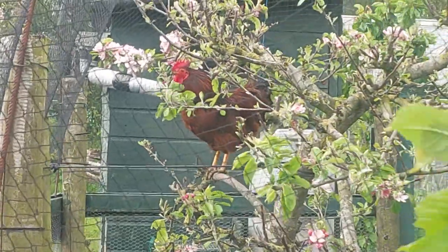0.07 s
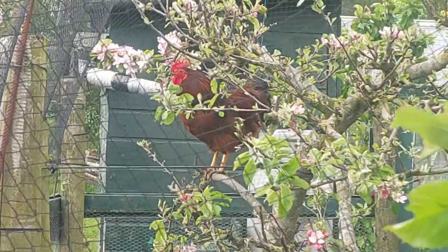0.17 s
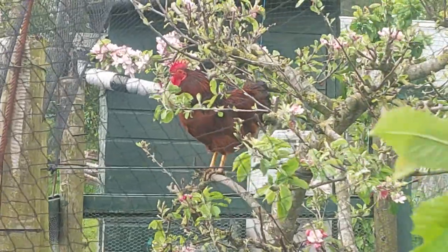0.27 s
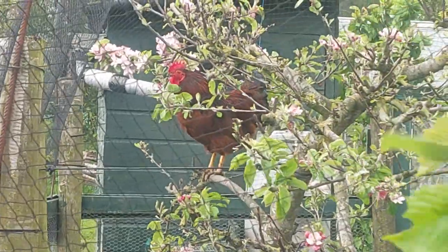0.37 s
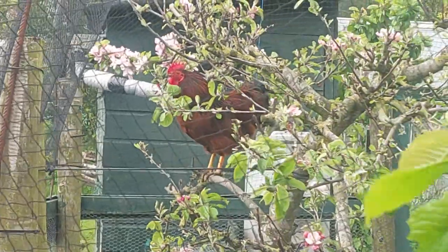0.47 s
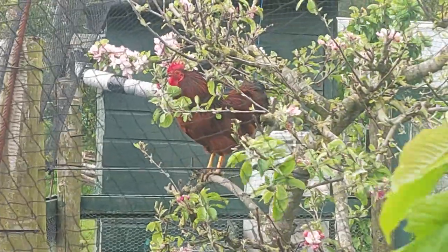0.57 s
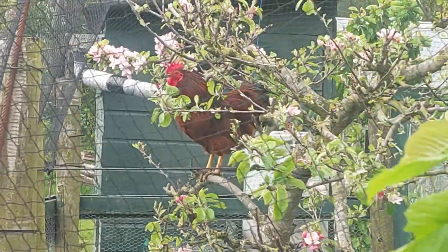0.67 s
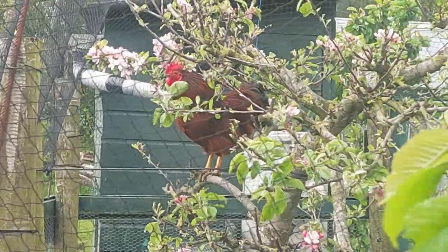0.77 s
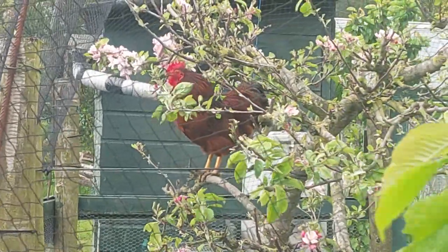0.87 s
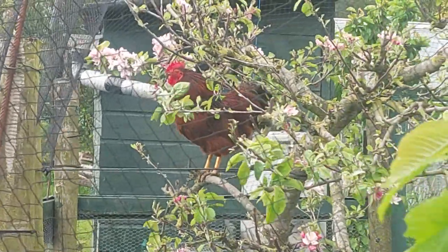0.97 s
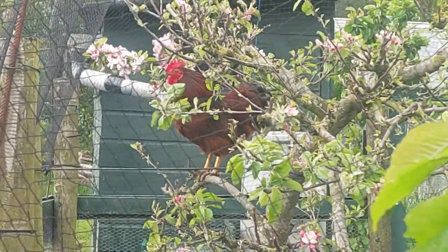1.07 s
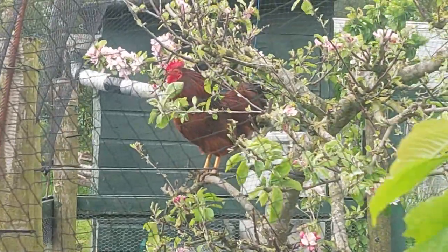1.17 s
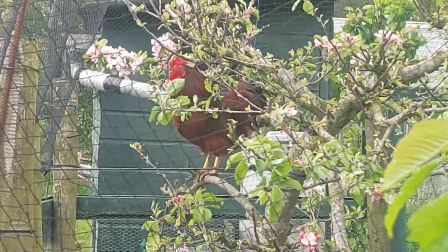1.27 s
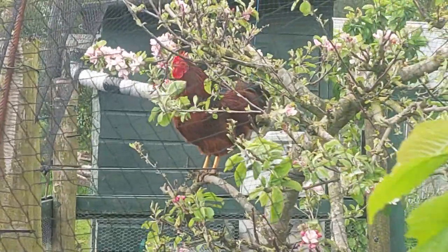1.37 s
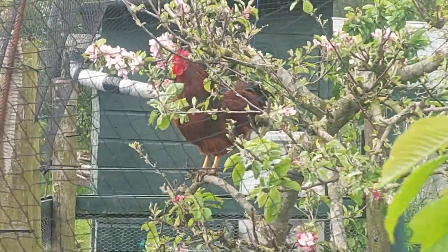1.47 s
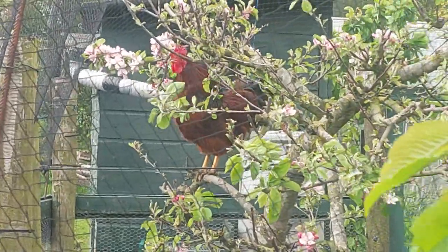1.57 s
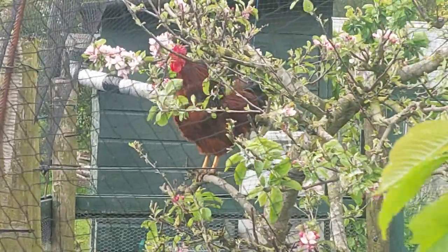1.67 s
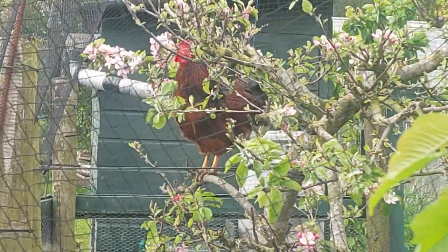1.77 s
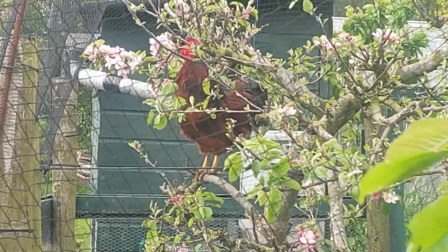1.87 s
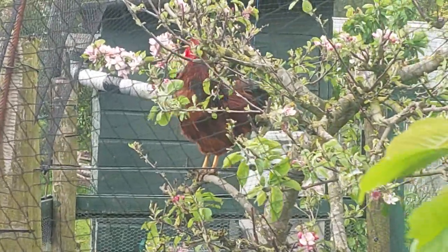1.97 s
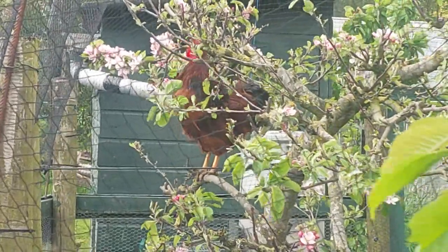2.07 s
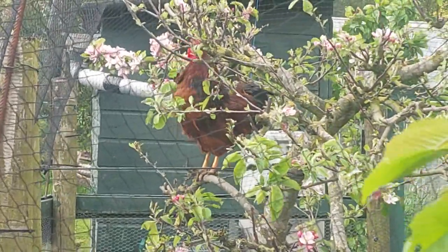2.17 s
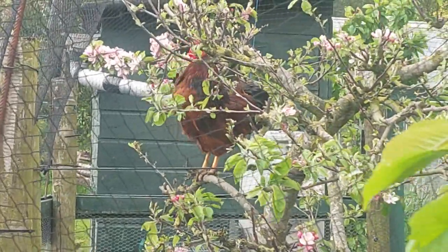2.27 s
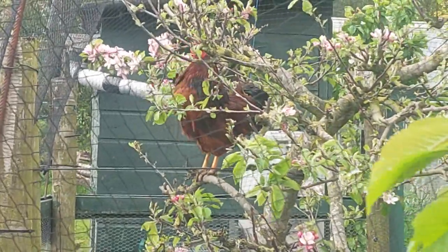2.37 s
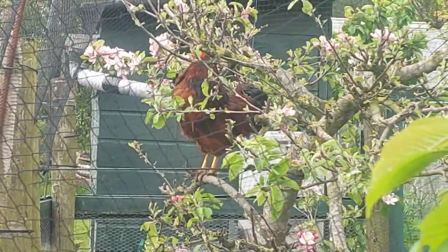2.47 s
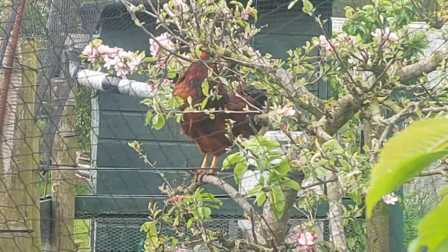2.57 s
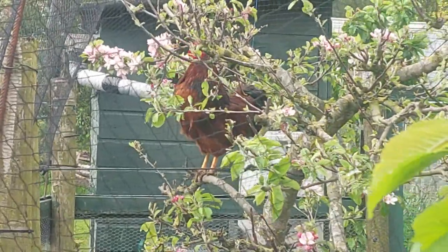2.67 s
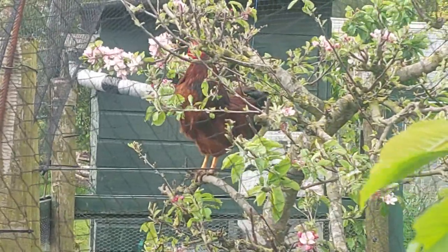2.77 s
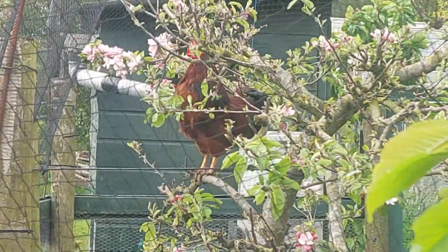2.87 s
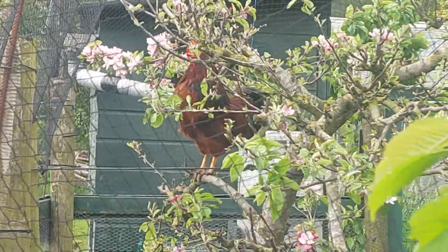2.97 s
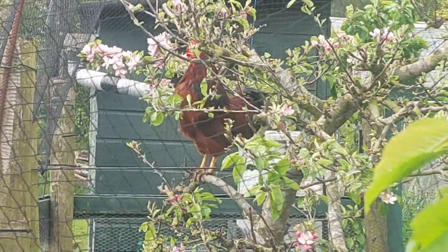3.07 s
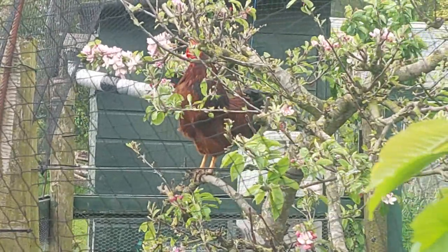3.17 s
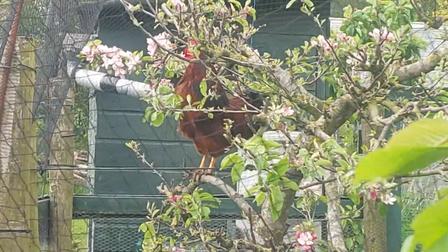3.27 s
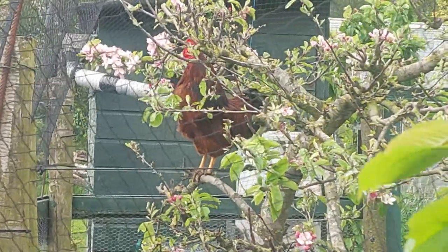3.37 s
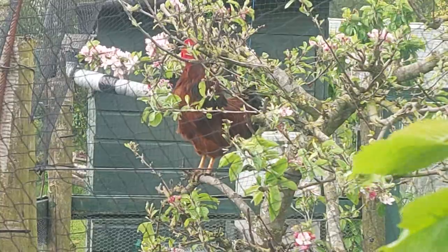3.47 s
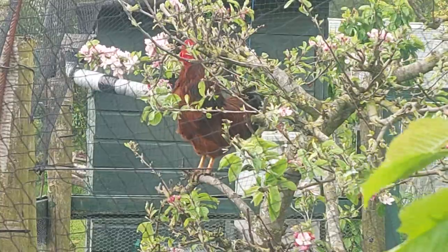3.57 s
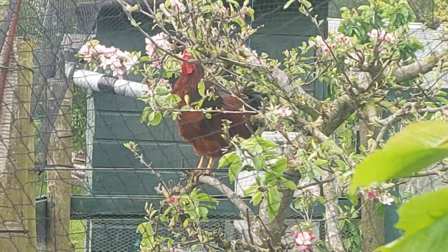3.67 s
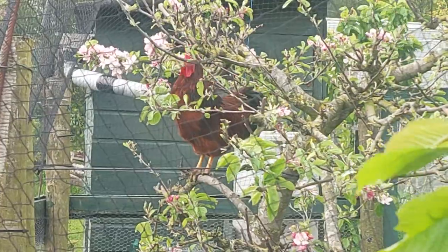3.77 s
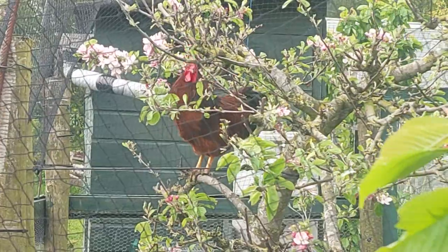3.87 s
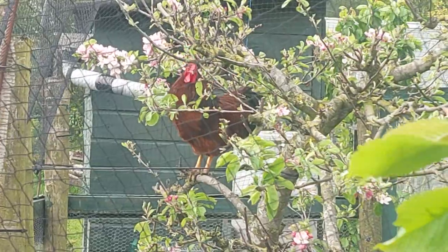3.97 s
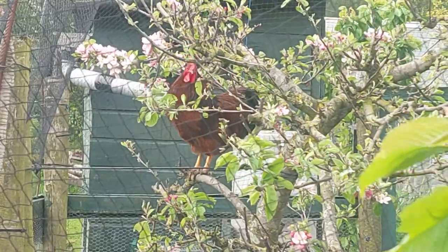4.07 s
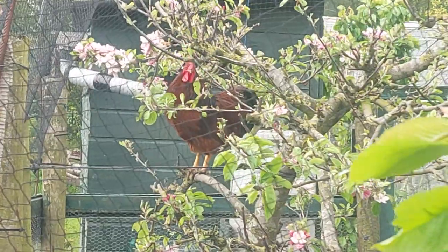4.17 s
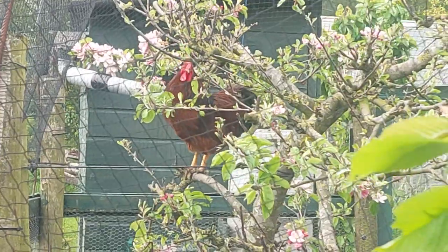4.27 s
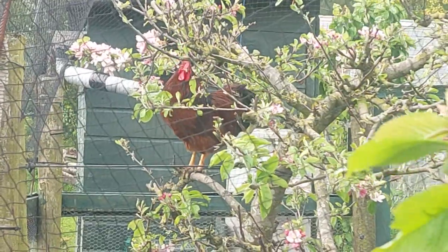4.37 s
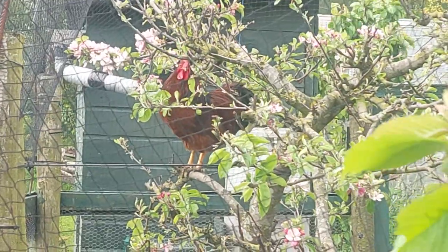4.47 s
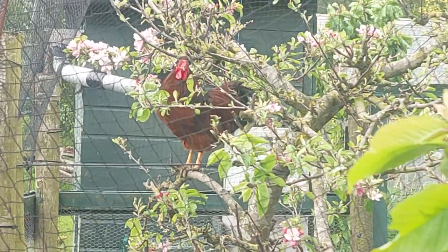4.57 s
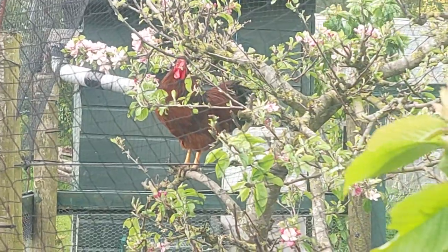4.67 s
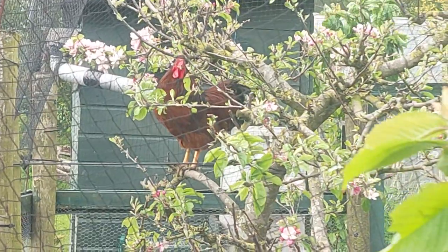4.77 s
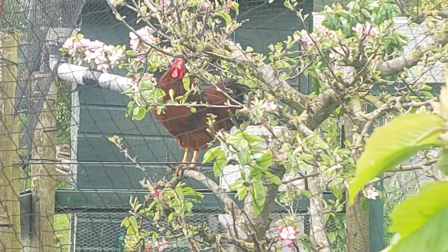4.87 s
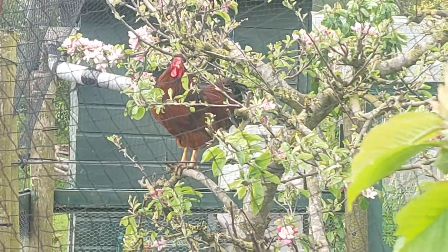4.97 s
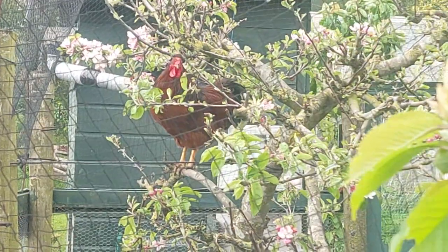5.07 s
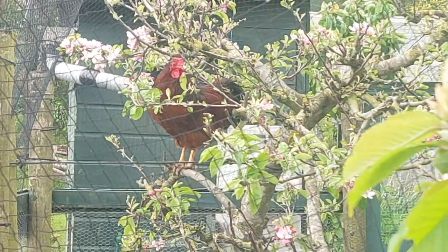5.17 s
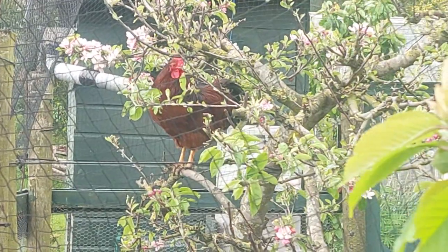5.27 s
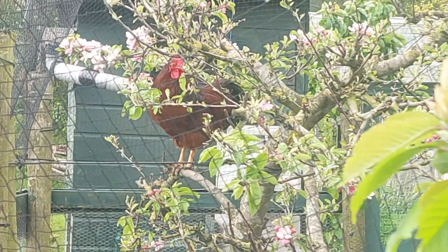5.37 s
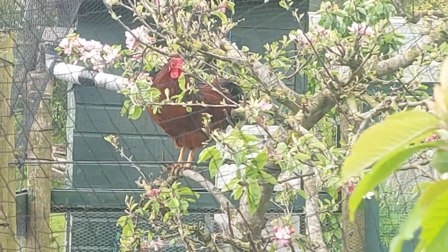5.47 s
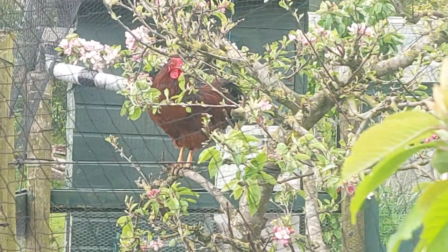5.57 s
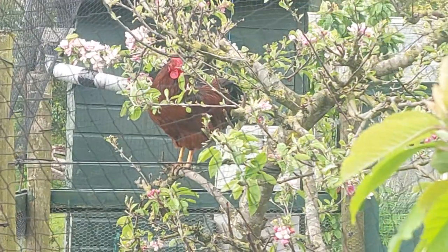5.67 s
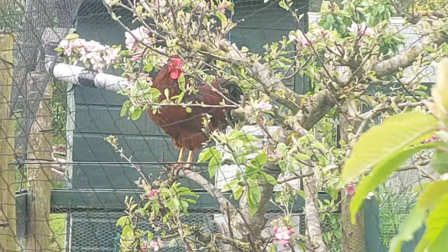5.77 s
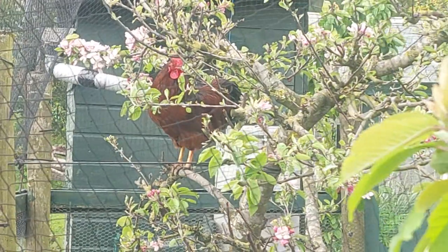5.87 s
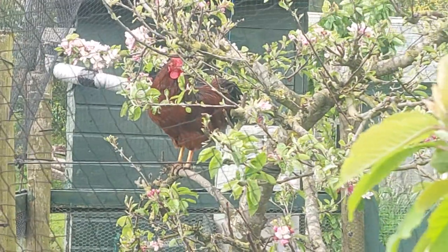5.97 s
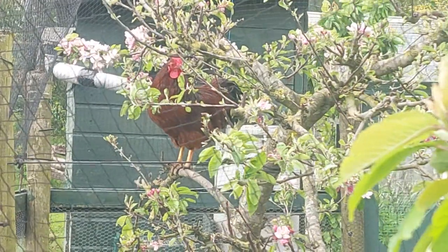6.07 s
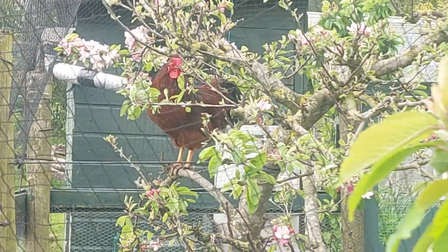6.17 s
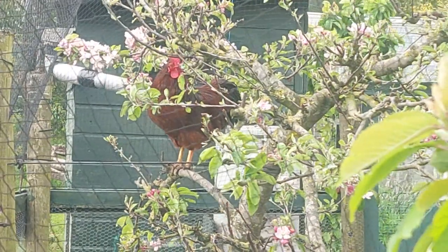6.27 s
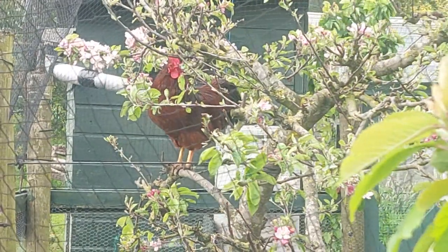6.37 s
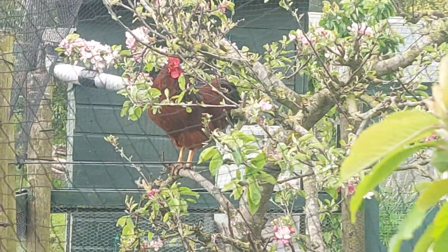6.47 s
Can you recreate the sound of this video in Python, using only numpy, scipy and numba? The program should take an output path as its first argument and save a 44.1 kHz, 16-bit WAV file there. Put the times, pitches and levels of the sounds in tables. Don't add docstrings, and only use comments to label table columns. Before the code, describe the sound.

A garden heard through a stereo phone microphone, with a faint road hum towards the left. From 0 to 0.3 s, irregular low wind thumps hit the microphone, with leaf hiss fading away. Thin bird whistles and falling chirps appear from about 0.4 to 1.7 s, with another wind bump and a tick near 1.2 s. At 1.76 s a rooster a few metres away crows: a rough opening syllable sinks by 2.05 s, a loud, high call leaps up at 2.1 s and holds until 2.7 s, mixing harsh rasp and clean notes, then a lower syllable falls and rises until 3.15 s, fading as breathy rasp by about 3.6 s. A short outdoor echo follows. The background is briefly hushed, then road hum returns around 4.5 s, with a dry tick. From 5.3 s, faint birds whistle again; from 6.1 s, twigs tick, low wind bumps and leaves stir until 6.5 s.

```python
import sys
import numpy as np
from scipy import signal
from scipy.fft import rfft, irfft
from scipy.io import wavfile
from scipy.ndimage import uniform_filter1d
from numba import njit

SR = 44100
rng = np.random.default_rng(int(sys.argv[2]) if len(sys.argv) > 2 else 0)


def transcribe(u):
    v = np.clip(np.atleast_2d(u).T, -1, 1)
    q = np.round(v * 32767).astype(np.int16)
    wavfile.write(sys.argv[1], SR, q)


def amplitude_ratio(level_db):
    exponent = np.asarray(level_db, float) / 20
    return 10 ** exponent


N = 287532
TIME = np.arange(N) / SR


def unit(x):
    return x / np.sqrt(np.mean(x ** 2))


def curves(rows):
    s, *columns = np.transpose(rows)
    return [np.interp(TIME, s, c) for c in columns]


def swell(t, length, edge):
    return np.clip(np.minimum(t, length - t) / edge, 0, 1)


def gate(t0, t1, edge=0.0047):
    return swell(TIME - t0, t1 - t0, edge)


def span(t0, t1):
    return slice(int(t0 * SR), min(int(t1 * SR), N))


def turns(hz):
    return 2 * np.pi * np.cumsum(hz) / SR


def decay(t, t60):
    return np.exp(-np.log(1000) * t / t60)


def echo_tail(t, t60, first_s=0):
    tail = rng.standard_normal((2, len(t))) * decay(t, t60) * (t >= first_s)
    return tail / np.sqrt(np.sum(tail ** 2, axis=1, keepdims=True))


def colour(x, points):
    hz, db = np.transpose(points)
    f = np.fft.rfftfreq(N, 1 / SR) + 1
    return irfft(rfft(x) * amplitude_ratio(np.interp(np.log(f), np.log(hz), db)), N)


def band(x, lo_hz, hi_hz, order=2):
    return signal.sosfilt(signal.butter(order, [lo_hz, min(hi_hz, SR / 2.2)], "band", fs=SR, output="sos"), x)


def walk(rate, size=N):
    k = int(SR / rate)
    steps = np.repeat(rng.standard_normal(size // k + 1), k)
    return 1.4 * uniform_filter1d(uniform_filter1d(steps, k), k)[:size]


@njit
def svf(x, hz, width):
    y, b, l = np.empty(len(x)), 0., 0.
    for i in range(len(x)):
        g, k = np.tan(np.pi * hz[i] / SR), width / hz[i]
        v = (b + g * (x[i] - l)) / (1 + g * (g + k))
        b, l, y[i] = 2 * v - b, l + 2 * g * v, k * v
    return y


# (time [s], level [dB])
ROAD_LEVEL = [
    (0.0, -58.5),
    (1.566, -61),
    (1.72, -56.5),
    (3.62, -60),
    (3.82, -64.5),
    (4.5, -59),
    (4.88, -56.5),
    (5.49, -57.5),
    (6.36, -56.5),
]
# (frequency [Hz], level [dB per Hz])
ROAD_COLOUR = [(180, -31.5), (300, -7), (498, -4.5), (580, -3.5), (876, -2.5), (1320, -8), (1690, -7.5),
               (3430, -25), (5000, -38), (6500, -60.5), (11000, -120)]


def road():
    level_db = curves(ROAD_LEVEL)[0]
    lag = 15
    layers = []
    for alike, lo_hz, hi_hz in ((.78, 350, 1500), (.5, 1500, 4500)):
        both, left, right = (colour(rng.standard_normal(N), ROAD_COLOUR) for _ in range(3))
        shared = np.array([both, np.roll(both, lag)])
        pair = alike * shared + np.sqrt(1 - alike ** 2) * np.array([left, right])
        layers.append(unit(band(pair, lo_hz, hi_hz)))
    hum = layers[0] * amplitude_ratio(level_db + 7 + 1.1 * walk(5.7))
    swish = layers[1] * amplitude_ratio(level_db - 1.5 + .8 * walk(6.4))
    return hum + swish


def far_whine():
    whine = unit(band(rng.standard_normal((2, N)), 3840, 4030))
    return whine * amplitude_ratio(-80.5 + 2.8 * walk(2.47)) * gate(3.5, 7, edge=0.15)


# (frequency [Hz], level [dB per Hz])
LEAF_COLOUR = [(1470, -38), (2500, -2), (2980, -3.5), (4600, -3), (4960, -4.5), (6210, -4.5), (8320, -8),
               (9410, -17.5), (13400, -12), (15100, -17.5), (15800, -21)]


def leaves():
    fading_db = -62.5 - 8.5 * TIME
    rising_db = -70.5 - 41 * (TIME[-1] - TIME)
    still_db = -77.5
    stir = np.sqrt(amplitude_ratio(fading_db) ** 2 + amplitude_ratio(rising_db) ** 2 + amplitude_ratio(still_db) ** 2)
    hiss = unit(colour(rng.standard_normal((2, N)), LEAF_COLOUR))
    return hiss * stir * amplitude_ratio(8.0) * amplitude_ratio(.7 * walk(6))


# (time [s], length [s], start [Hz], end [Hz], level [dB])
BIRD_WHISTLES = [(0.662, 0.052, 2300, 2400, -63.5), (0.92, 0.069, 2360, 2440, -61.5),
                 (0.974, 0.08, 2434, 2430, -59), (1.058, 0.12, 2400, 2300, -64.5),
                 (1.195, .125, 2400, 2370, -65), (1.489, 0.1, 2490, 2520, -60.5),
                 (1.64, .08, 2400, 2430, -68), (5.742, 0.023, 2670, 2510, -55),
                 (5.772, 0.145, 2310, 2450, -59), (1.277, 0.074, 3590, 3100, -58.5),
                 (1.352, 0.052, 3120, 3430, -59), (1.655, 0.055, 3460, 3480, -56),
                 (1.694, 0.0427, 3480, 3100, -51), (1.733, 0.03, 3090, 3160, -54),
                 (6.324, 0.066, 3220, 3410, -58), (6.388, 0.05, 3230, 3230, -54.5),
                 (6.458, 0.06, 3150, 3300, -62.5), (6.384, .016, 2700, 3200, -59),
                 (6.43, .014, 3150, 2600, -60), (6.452, .016, 2700, 3150, -63), (5.9, .06, 2440, 2420, -68),
                 (1.672, 0.034, 6050, 4640, -67), (5.275, 0.075, 2100, 1930, -67.5),
                 (5.58, 0.095, 1934, 1800, -68), (6.053, 0.18, 1933, 1825, -64.5),
                 (5.733, 0.07, 671, 655, -66), (5.848, 0.1, 673, 673, -59), (6.019, 0.1, 673, 667, -56)]
# (time [s], length [s], start [Hz], end [Hz], level [dB])
BIRD_CHIRPS = [
    (0.442, .06, 6030, 4660, -59),
    (0.815, 0.046, 6500, 5720, -61.5),
    (1.566, 0.045, 6300, 4650, -61),
    (5.685, 0.016, 2700, 2450, -60.5),
    (5.711, 0.023, 2950, 2360, -59),
    (6.0, 0.063, 6600, 5650, -68),
    (6.359, 0.035, 6370, 5520, -59),
    (6.375, 0.016, 2700, 2650, -53),
    (6.438, 0.022, 2700, 2620, -56),
]


def birds():
    size = SR // 3
    t = TIME[:size]
    calls = np.zeros(N + SR)
    for s, length, start_hz, end_hz, db in BIRD_WHISTLES:
        hz = np.interp(t, [0, length], [start_hz, end_hz])
        warble = 1 + .012 * walk(110, size)
        shake_db = 3 * walk(70, size)
        tone = swell(t, length, .12 * length) * np.sin(turns(hz * warble))
        calls[int(s * SR):][:size] += amplitude_ratio(db + 6.5 + shake_db) * tone
    fall_s = .02
    for s, length, start_hz, end_hz, db in BIRD_CHIRPS:
        hz = end_hz + (start_hz - end_hz) * np.clip(1 - t / fall_s, 0, 1) ** 1.5
        shake_db = 2.2 * walk(90, size)
        tone = swell(t, length, 0.0032) * np.sin(turns(hz))
        calls[int(s * SR):][:size] += amplitude_ratio(db + 2.5 + shake_db) * tone
    direct = np.array([calls, np.roll(calls, 5)])[:, :N]
    echoes = signal.fftconvolve(calls[None], echo_tail(t, .16))[:, :N]
    return direct + amplitude_ratio(-9) * echoes


# (time [s], centre [Hz], width [Hz], decay [s], level [dB])
BRANCH_TICKS = [(1.255, 5170, 4970, .012, -53.5), (3.95, 13000, 4000, .12, -77),
                (4.546, 13560, 3970, .003, -53.5), (6.103, 7200, 1490, 0.0047, -59.5),
                (6.196, 6480, 5000, 0.0065, -61), (6.25, 6000, 2020, .005, -60),
                (6.282, 7930, 1500, 0.0046, -59.5), (6.367, 7000, 5000, 0.044, -64),
                (6.415, 7360, 4000, .008, -57), (6.378, 13000, 4980, 0.077, -73),
                (6.494, 7100, 2450, .008, -59.5)]


def branches():
    out = np.zeros((2, N))
    for s, hz, width, length, db in BRANCH_TICKS:
        puff = unit(band(rng.standard_normal((2, SR // 4)), hz - width / 2, hz + width / 2))
        i = int(s * SR)
        puff = (puff * np.exp(-TIME[:SR // 4] / length))[:, :N - i]
        out[:, i:i + puff.shape[1]] += amplitude_ratio(db) * puff
    return out


# (time [s], level [dB], left minus right [dB])
WIND_LEVEL = [(0.0, -29.5, -4), (0.07, -52.5, -13), (0.13, -34, -11), (0.27, -43.5, 4), (0.34, -63, -15),
              (0.44, -47, -7), (1.18, -58.5, 10), (1.23, -37.5, -3), (1.45, -68.5, 17), (1.6, -54, 16),
              (1.74, -55, 11), (2.6, -50.5, 3.5), (2.95, -56.5, 9.5), (3.54, -51.5, 1), (3.66, -65, 3),
              (3.9, -61.5, 4), (5.08, -49, 3.5), (6.3, -48.5, -1)]
# (time [s], peak [dB], frequency [Hz], left minus right [dB], t60 [s])
BUFFETS = [(0.004, -18, 133, -30, 0.0086), (0.099, -30, 94, -24.5, 0.081), (0.12, -28, 140, -23, 0.051),
           (0.16, -29, 289.5, 4, 0.1), (0.173, -30.5, 106, 24, 0.096), (0.218, -35.5, 127, 20, 0.11),
           (0.249, -22.5, 69, 11, 0.063), (0.632, -35.5, 64, 1.5, 0.14), (1.218, -22.5, 108.6, 11, 0.11),
           (1.281, -30, 73.4, -11, 0.073), (1.597, -33, 59.2, 15.5, 0.092), (2.013, -31.5, 190, 1, 0.076),
           (2.02, -37.5, 65, 0, 0.13), (2.031, -30, 184.7, 0, 0.11), (2.062, -38.5, 200, 0, 0.07),
           (2.094, -34, 85, 1.5, 0.09), (4.12, -41.5, 56.94, 2, 0.28), (6.19, -34.5, 60, 0, .15),
           (6.47, -32.5, 55, 0, 0.26), (2.771, -32.5, 62.4, 6, 0.16), (6.112, -32, 65.45, 0, 0.2),
           (6.284, -28, 69.2, 0, 0.38)]


def wind():
    db, pan_db = curves(WIND_LEVEL)
    calm_db = -55.5
    upper_db = -3 - 0.44 * (db - calm_db)
    out = np.zeros((2, N))
    for lo_hz, hi_hz, gain in ((43.2, 106.7, amplitude_ratio(db)), (106, 363, amplitude_ratio(db + upper_db))):
        both, left, right = (unit(band(rng.standard_normal(N), lo_hz, hi_hz)) * amplitude_ratio(3 * walk(16))
                             for _ in range(3))
        out += gain * (.68 * both + .73 * np.array([left, right]))
    out *= amplitude_ratio(np.array([pan_db, -pan_db]) / 2)
    for s, peak_db, hz, side_db, t60 in BUFFETS:
        t = np.clip(TIME - s, 0, None)
        bent = t + 0.0044 * (1 - np.exp(-t / 0.0054))
        push = np.sin(2 * np.pi * hz * bent) * decay(t, t60) * np.minimum(t / .002, 1)
        out += amplitude_ratio(peak_db - 2.5 + np.array([[side_db], [-side_db]]) / 2) * push
    return out


TIRING_FROM_S = 2.25
# (half-pitch lines [dB], partials over 4.6 kHz [dB], chaos sinks from [s],
# chaos returns at [s], chaos left [dB])
NOTE_LOCK = [(-41, -10.5, 1.885, 1.955, -11), (-6.5, -1, 2.122, 2.232, -22),
             (-17.5, -9, 2.588, 2.708, -11.5), (-42, -5.5, 2.938, 2.998, -17.5),
             (-37.5, -16, 3.035, 3.148, -33), (-29.5, -2, 1.762, 1.803, -5.5), (-14, -24.5, 2.25, 2.58, -1),
             (-16, -25, 3.16, 3.54, -1), (-20, -4, 2.21, 2.24, -3), (-20, -20, 2.995, 3.04, -3.5)]
# (from [s], to [s], rise [dB])
NOTE_SLIPS = [
    (2.645, 2.68, 8.5),
    (2.118, 2.158, 9),
]


def chaos_db():
    lock_s = 0.026
    total = 0
    for *_, t0, t1, db in NOTE_LOCK + NOTE_SLIPS:
        total += db * np.clip(np.minimum((TIME - t0) / lock_s, 2 * (t1 - TIME) / lock_s), 0, 1)
    return total


@njit
def pulses(hz, disorder, chance):
    out, p, k = np.zeros(len(hz) + 1), 0., 0
    for i in range(len(hz)):
        step = hz[i] * np.exp(disorder[i] * chance[k, 0]) / SR
        p += step
        if p >= 1:
            p, k = p - 1, k + 1
            size = np.exp(disorder[i] * chance[k, 1])
            out[i] += size * p / step
            out[i + 1] += size * (1 - p / step)
    return out[:-1]


# (time [s], rate [Hz], disorder [0-1])
SLAP_RATE = [
    (1.75, 720, .3),
    (2.05, 700, .25),
    (2.1, 1000, .3),
    (2.7, 1000, .3),
    (2.75, 800, .3),
    (3.1, 800, .25),
    (3.6, 700, .28),
]
# (time [s], effort [dB], beak opening [0-1], neck stretch of resonances [%])
PHRASES = [
    [(1.759, -33.5, 0.8, -2), (1.787, -26.5, 0.23, 1.5), (1.9, -20, 0.2, 0.99), (1.98, -32, .4, -0.54),
     (2.045, -50, 0.47, -0.82)],
    [(2.097, -42, 0.9, 2), (2.109, -24, 0.33, 1), (2.169, -29.5, 0.84, -3), (2.239, -28, 0.16, -3.5),
     (2.3, -22.5, 0.39, 3), (2.42, -24.5, 0.51, 1.5), (2.59, -28, 0.61, 1.5), (2.72, -26, 0.63, 1)],
    [(2.822, -24.5, 0.57, 1.2), (2.92, -27, 0.54, 1.2), (3.0, -28, 0.44, 1.8), (3.035, -28, 0.45, 2.2),
     (3.09, -27, 0.7, -2)],
    [(3.145, -34, 0.85, 0.5), (3.165, -38, 0.66, -3), (3.481, -43, 0.74, -3.5), (3.543, -43.5, 0.38, -5),
     (3.565, -56.5, 0.5, -4), (3.69, -72, 0.6, -2.5)],
]
# (centre [Hz], width [Hz], level [dB], first syllable change [dB], last change [dB])
WINDPIPE = [(856, 70.5, 4, 0, 0), (1008, 60, -8.5, 6, -0.5), (1420, 143, 2.5, 1, 2),
            (1663, 180, -4.5, -2.5, 7.5), (2108, 160, 0.5, -0.5, 0), (2285, 50, -8, -1.5, 0.5),
            (2547, 160, -9, 0, 0), (3021, 110, -2, 1, 3), (3764, 160, -4, -7, -4),
            (4020, 250, -3, -2.5, -0.5), (4360, 310, -14.5, 4, 0), (5310, 80, -5.5, 2.5, 1),
            (5300, 698, -8.5, -4, -10), (6420, 110, -5.5, -6.5, -0.5), (7000, 600, -11, -1, -5.5),
            (8740, 680, -23, 4.5, 1), (10140, 1500, -25.5, -0.5, -0.5), (12250, 2700, -15.5, 4.5, 2),
            (14860, 2600, -15.5, -2.5, -2.5)]
WINDPIPE_SPLIT = [1800, 4700, 8000]


def rough_voice():
    low_db, beak, neck = curves(sum(PHRASES, []))
    effort_db = low_db + 24
    tired_s = np.clip(TIME - TIRING_FROM_S, 0, None)
    middle_db = -10 + 18.5 * beak
    top_db = -16.5 + 8.5 * beak - 7.5 * tired_s
    hiss_db = -60.5 + 0.42 * effort_db + 12.5 * beak - 4.5 * tired_s
    hz, disorder = curves(SLAP_RATE)
    throat_db = 2.5 + 32 * (hz / 1000 - 1)
    beak_ring_db = 1 + .4 * effort_db + 10.5 * (hz / 1000 - 1)
    disorder = np.clip(disorder * (.75 + .27 * walk(35)), .07, .6)
    slaps, other, edge = (pulses(hz, disorder, rng.standard_normal((N // 10, 2))) for _ in range(3))
    first, last = TIME < PHRASES[1][0][0], TIME > 3.1
    part = span(1.7, 3.7)
    size = len(TIME[part])
    neck_sway = neck[part] / 100 + .012 * walk(22)[part]
    palate = .06 * np.clip(1 - tired_s / .55, 0, 1)
    edge_tired_db = np.minimum(14 * tired_s, 7.5)
    groups = np.zeros((4, N))
    for k, (f, width, db, first_db, last_db) in enumerate(WINDPIPE):
        low_end = 1 if f < 2500 else .5 * (f < 3300)
        centre = f * (1 + low_end * neck_sway + .006 * walk(35, size))
        centre *= 1 + (5000 < f < 5700) * palate[part]
        source = (slaps, other)[k % 2][part]
        ring = svf(svf(source, centre, 1.5 * width), centre, 1.5 * width)
        posture_db = throat_db * (900 < f < 1150) + beak_ring_db * (2800 < f < 3300)
        posture_db = posture_db + first_db * first + last_db * last
        posture_db -= (6800 < f < 9500) * edge_tired_db
        flicker_db = 1.7 * walk(90, size)
        group = np.searchsorted(WINDPIPE_SPLIT, f)
        groups[group, part] += amplitude_ratio(db + posture_db[part] + flicker_db) * unit(ring)
    low, middle, top, hiss = (g / g[part].std() for g in groups)
    on = gate(PHRASES[0][0][0], PHRASES[0][-1][0]) + gate(PHRASES[1][0][0], PHRASES[-1][-1][0])
    leak = band(edge, 1250, 6300, order=3)
    middle += amplitude_ratio(-20.5) * leak / leak[part].std()
    rasp = amplitude_ratio(low_db + chaos_db()) * (low + amplitude_ratio(middle_db) * middle + amplitude_ratio(top_db) * top)
    rasp = colour(rasp, [(3150, 0), (3400, -7), (3650, -1.5)])
    rise = int(.012 * SR)
    breath = uniform_filter1d(on, rise, origin=rise // 2 - 1)
    return on * (rasp + breath * amplitude_ratio(hiss_db + 1.2 * walk(25)) * hiss)


# (time [s], pitch [Hz], level [dB])
CLEAN_NOTES = [
    [(1.875, 735, -26), (1.905, 720, -22), (1.935, 703, -25.5), (1.96, 712, -32), (2.025, 707, -43.5)],
    [(2.12, 1033, -26), (2.131, 1011, -19.5), (2.147, 1035, -18.5), (2.163, 1043, -19),
     (2.181, 1038, -17.5), (2.193, 1028, -18), (2.2, 1021, -21.5), (2.211, 993, -22.5), (2.226, 972, -33)],
    [(2.58, 1055, -28), (2.6, 1040, -26), (2.652, 1043, -26), (2.663, 1058, -24.5), (2.675, 1042, -27),
     (2.71, 1064, -30)],
    [(2.935, 772, -26.5), (2.98, 786.5, -27), (2.995, 799, -21.5)],
    [(3.04, 994.4, -28), (3.09, 1005, -26.5), (3.125, 999, -29), (3.15, 970, -31)],
    [(1.765, 663, -33.5), (1.785, 717, -27), (1.803, 740, -26.5)],
    [(2.27, 990, -33), (2.31, 1019, -29), (2.45, 1010, -32), (2.585, 1036, -31)],
    [(3.15, 1001, -42), (3.3, 1005, -46), (3.45, 1003, -47), (3.55, 1001, -52)],
    [(2.207, 987, -28), (2.221, 968, -23), (2.233, 967, -25), (2.246, 970, -34)],
    [(2.99, 1000, -32.5), (3.02, 1001, -31.5), (3.05, 1003, -31.5)],
]
# (partials 1, 2, 3, 4 against its level [dB])
NOTE_PARTIALS = [(-19, 0, -6, -18.5), (-11, -7.5, -1.5, -13), (-8.5, 0, -3.5, -11.5), (-4, -1.5, -7, -11),
                 (-14.5, -1, -3, -3), (-14, 1.5, -3.5, -18.5), (-21, -8.5, -1, -14), (-22, -1.7, -10.5, -4),
                 (0, -15, -20, -7.5), (-30, -14, -10, -0.5)]
# (frequency [Hz], level [dB])
UPPER_PARTIALS = [(3550, -24), (3900, 1.5), (4200, -10.5), (4800, -25.5), (6200, -22), (7300, -19),
                  (8500, -33), (10300, -53.5), (12000, -25.5), (14600, -25), (16000, -45.5)]


def clean_voice():
    out = np.zeros(N)
    shrill_hz, shrill_db = np.transpose(UPPER_PARTIALS)
    size = SR // 2
    for rows, voicing, (half_db, edge_db, _, _, left_db) in zip(CLEAN_NOTES, NOTE_PARTIALS, NOTE_LOCK):
        start_s, end_s = rows[0][0], rows[-1][0]
        part = slice(int(start_s * SR), int(start_s * SR) + size)
        hz, note_db = (c[part] for c in curves(rows))
        levels = [note_db + db + .7 * walk(29.94, size) for db in voicing]
        levels[0] += 0.1943 * (hz.max() - hz)
        shiver = .014 * amplitude_ratio(left_db) * walk(160, size)
        phase = turns(hz * (1 + 0.0025 * walk(80, size) + shiver))
        top_db = np.maximum(levels[1], levels[2])
        note = sum(amplitude_ratio(db) * np.sin(k * phase + k) for k, db in enumerate(levels, 1))
        for k in range(5, 16):
            db = top_db + np.interp(k * hz, shrill_hz, shrill_db) + edge_db * (k * hz > 4600)
            db -= 8 * (start_s > TIRING_FROM_S) * (k * hz > 6700) * (k * hz < 9500)
            db += 1.5 * walk(40, size)
            note += amplitude_ratio(db) * np.sin(k * phase + k)
        shed_db = (left_db < -20) * 330 * TIME[:size]
        for k in range(1, 7):
            db = top_db + half_db - 2 * k - shed_db + 5.3 * walk(42, size)
            note += amplitude_ratio(db) * np.sin((k + .5) * phase)
        note *= amplitude_ratio(5 * amplitude_ratio(left_db) * walk(140, size))
        out[part] += np.sqrt(2) * gate(start_s, end_s, edge=0.011)[part] * note
    return out


# (time [s], pitch [Hz], level [dB])
PIPE_LOCKS = [
    [(1.795, 759, -25), (1.817, 814, -21), (1.89, 835, -24)],
    [(2.278, 780, -29), (2.3, 810, -23.5), (2.322, 830, -28)],
    [(2.755, 820, -27), (2.78, 820, -24.5), (2.805, 825, -28)],
    [(2.912, 850, -27), (2.935, 835, -24), (2.95, 800, -28.5)],
    [(2.99, 833.5, -27), (3.01, 830, -22.5), (3.05, 824, -30.5)],
]


def fluttering_voice():
    hz, db = curves(sum(PIPE_LOCKS, []))
    flutter = 1 + 0.27 * np.sin(turns(115 * (1 + 0.41 * walk(40))))
    tone = amplitude_ratio(db) * flutter * np.sin(turns(hz))
    second_hz = 1.77 * hz * (1 + .02 * walk(120))
    tone += amplitude_ratio(db - 10 + 3 * walk(130)) * np.sin(turns(second_hz))
    return np.sqrt(2) * sum(gate(rows[0][0], rows[-1][0]) for rows in PIPE_LOCKS) * tone


# (frequency [Hz], left leads [rad], left minus right [dB])
PORT_DIFFERENCE = [(820, .4, -4), (1300, 1.1, 1), (1640, 1.8, 1.5), (2150, 4.9, -2), (2670, 8.7, -1),
                   (3100, 11.4, -4.5), (3400, 9.6, 1.5), (4220, 15.4, -1), (5400, 14.3, 3), (6115, 15.5, 4),
                   (6420, 18.4, 2), (6650, 15.7, 0), (7300, 16.3, 3.5), (8800, 17.3, 2.5)]


def rooster():
    voice = rough_voice() + clean_voice() + fluttering_voice()
    hz, lead, pan_db = np.transpose(PORT_DIFFERENCE)
    f = np.fft.rfftfreq(N, 1 / SR)
    half = amplitude_ratio(np.interp(f, hz, pan_db) / 2) * np.exp(.5j * np.interp(f, hz, lead))
    side = (half - 1 / half) / (half + 1 / half + 1e-9)
    side *= np.clip(abs(side), amplitude_ratio(-13), amplitude_ratio(3.5)) / (abs(side) + 1e-9)
    direct = irfft(rfft(voice) * np.array([1 + side, 1 - side]), N)
    yard = echo_tail(TIME[:SR // 2], .42, first_s=.004)
    return direct + amplitude_ratio(-15) * signal.fftconvolve(voice[None], yard)[:, :N]


def scene():
    return road() + far_whine() + leaves() + birds() + branches() + wind() + rooster()


def top_cut(x):
    return signal.sosfilt(signal.butter(12, 15790, fs=SR, output="sos"), x)


def record(dry):
    mix = np.tanh(1.284 * dry) / 1.378
    return top_cut(mix)


dry = scene()
out = record(dry)
transcribe(out)
```